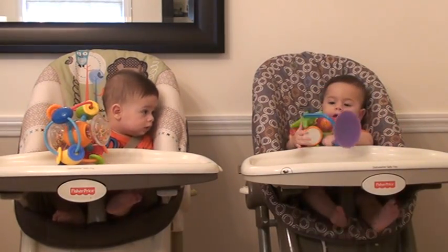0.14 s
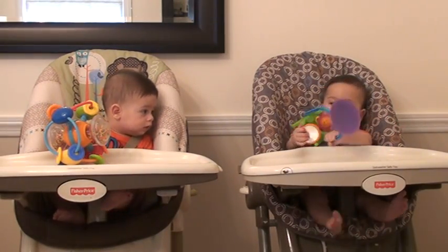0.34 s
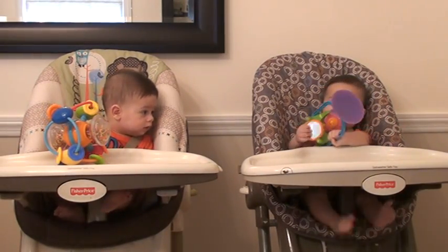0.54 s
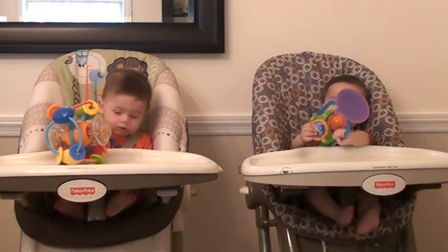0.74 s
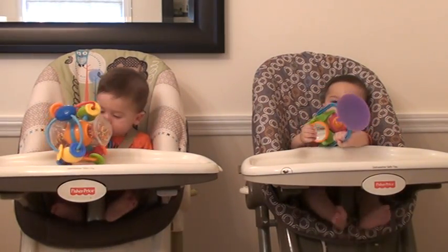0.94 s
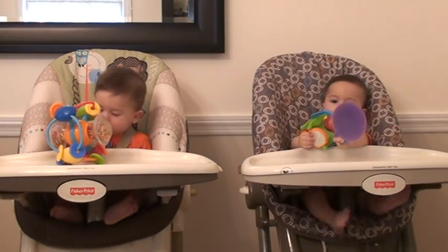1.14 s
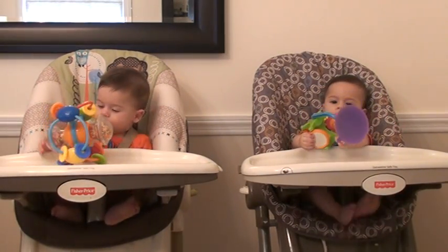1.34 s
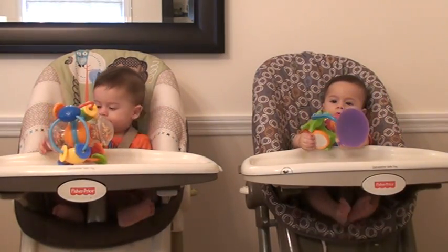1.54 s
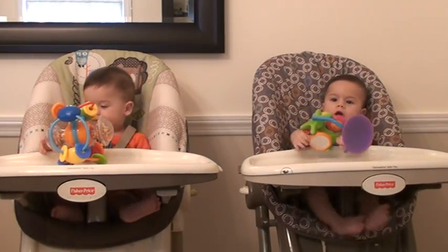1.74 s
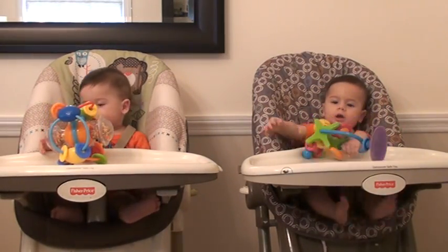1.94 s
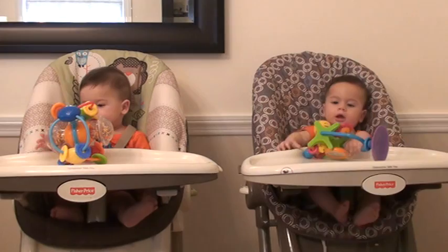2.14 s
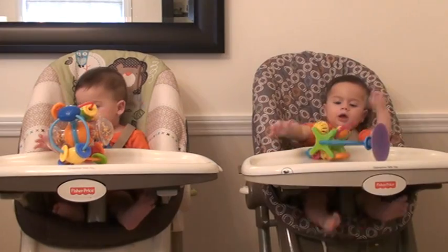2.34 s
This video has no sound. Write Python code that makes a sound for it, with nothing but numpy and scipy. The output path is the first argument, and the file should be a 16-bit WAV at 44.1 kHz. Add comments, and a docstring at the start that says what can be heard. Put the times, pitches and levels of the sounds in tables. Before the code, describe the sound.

Plastic rattle toys clack and jingle lightly, then one tumbles onto a hollow tray.

```python
"""Plastic rattle toys clack and a small bell jingles on a high-chair tray, close to a pair of
microphones in a small, live room. Loose parts knock, rebound and ring their hollow shells,
while a rolling pellet strikes the bell and beads tick inside a toy. Near the end a toy tumbles
onto the hollow tray and its beads scatter. A low household rumble lies behind it all."""
import sys
import numpy as np
from scipy import signal
from scipy.fft import rfft, irfft, next_fast_len
from scipy.io import wavfile
from scipy.ndimage import uniform_filter1d

SR = 44100
rng = np.random.default_rng(int(sys.argv[2]) if len(sys.argv) > 2 else 0)


def waveform_to_disk(signal):
    """Save audio, clipped to [-1, 1], as 16-bit WAV at the path in sys.argv[1]."""
    frames = np.transpose(np.atleast_2d(signal))
    scaled = np.clip(frames, -1, 1) * 32767
    samples = np.round(scaled).astype(np.int16)
    wavfile.write(sys.argv[1], SR, samples)


N = 105795

CLACK_T60_S, CONTACT_RISE_S, REBOUND_S, REBOUND_DB = 0.021, 0.0031, 0.0074, -9
def contact(t, rebounds=2):
    """A crack of hard plastic that builds briefly, followed by weaker rebounds."""
    gaps = REBOUND_S * rng.uniform(0.04, 1.62, rebounds)
    envelope = 0
    for k, at in enumerate(np.append(0, np.cumsum(gaps))):
        age = np.maximum(t - at, 0)
        envelope += amp(REBOUND_DB * k) * fade(age, CLACK_T60_S) * (1 - np.exp(-age / CONTACT_RISE_S))
    return envelope * rng.standard_normal(len(t))


# spectra of the knock, snap and thud in a blow on plastic: frequency_hz, gain_db
KNOCK_SPECTRUM = [(60, -28), (250, -13), (600, -4.5), (1400, -3), (2300, 0), (3100, -1), (4200, -9.5),
                  (7000, -32), (16000, -90)]
SNAP_SPECTRUM = [(1000, -31.5), (2800, -12.5), (4000, 2.5), (5400, 5), (7500, 3), (9800, -0.5),
                 (12000, -7.5), (16000, -12)]
THUD_SPECTRUM = [(50, -40), (170, -25.5), (340, 3.5), (950, 0), (1500, -8), (5000, -32)]
def knocks(hits, modes, detune, thud_db):
    """Plastic blows: a knock, a bright snap, and the ring and dull thud of the struck body."""
    out, t = np.zeros(N), np.arange(SR // 4) / SR
    for at, level_db, body_db, treble_db in hits:  # body and treble are relative to the level
        knock = burst(colour(contact(t), KNOCK_SPECTRUM))
        snap = amp(treble_db) * burst(colour(contact(t), SNAP_SPECTRUM))
        body = burst(ring(modes, t, scatter_db=3.0, detune=detune))
        thud = amp(thud_db) * burst(colour(contact(t), THUD_SPECTRUM))
        add(out, at, amp(level_db) * (knock + snap + amp(body_db) * (body + thud)))
    return out


# loose parts colliding: start_s, level_db, body_db, treble_db
PART_HITS = [(.079, -36, -33, 8), (.085, -27, -33, 4), (.093, -34, -19, -7), (.134, -48, -11, 3),
             (.152, -32, -3.5, 7), (.158, -33, -2.5, 10.5), (.172, -33.5, -24, 0),
             (.222, -36.5, -2.5, 10.5), (.470, -30, -24, -1), (.476, -33, -27, 8.5), (.509, -25, 2.5, -20),
             (.519, -27, 0, -2), (.544, -35.5, 1.5, 6), (.767, -38.5, 5.5, 3), (.774, -32.5, 1, -3),
             (.903, -40.5, -10, 1), (1.872, -34, -17, 3), (2.307, -27.5, -6.5, 3.5), (2.315, -22, -10, -5)]
# modes of the toy's shell: pitch_hz, level_db, t60_s
SHELL_MODES = [(284, -5.5, 0.1), (818, 0.5, 0.023), (1017, 3, 0.021), (1160, 4.5, 0.032), (1306, 0.5, 0.04),
               (1890, -3.5, 0.032)]
def clacks():
    """Loose parts knock together near the microphones and ring the hollow shell."""
    return amp(-8) * knocks(PART_HITS, SHELL_MODES, detune=0.03, thud_db=-5.5)


# the toy striking the tray: start_s, level_db, body_db, treble_db
TUMBLE_HITS = [(1.911, -31, -1, -20), (1.920, -20.5, 3, 1), (1.928, -23.5, -5, 6.5), (1.961, -26.5, -4, 10),
               (1.969, -23.5, 5, -10), (1.975, -22.5, -2, 6.5), (1.986, -24, -0.5, 3),
               (2.010, -27, -4, -10), (2.039, -36, 2, -6), (2.058, -29.5, -5, 7), (2.116, -35.5, 4, -18),
               (2.281, -31.5, -3.5, -10), (2.294, -28, -1, -2.5), (2.381, -38.5, 7, -5)]
# modes of the tray: pitch_hz, level_db, t60_s
TRAY_MODES = [(340.3, -2, 0.18), (425, -1.5, 0.13), (489, 1, 0.059), (547, 4.5, 0.065), (663.6, 6.5, 0.11),
              (766, -1, 0.049), (914, 0.5, 0.09), (990, -2, 0.072)]
def tumble():
    """A toy tumbles onto the hollow tray, which rings at each blow."""
    return amp(-5.5) * knocks(TUMBLE_HITS, TRAY_MODES, detune=0.025, thud_db=-8)


# light taps: start_s, level_db, body_db, treble_db
TAP_HITS = [(.968, -36, -0.5, -10.5), (.975, -38.5, 2.5, -24), (1.007, -51, 9, -22)]
# modes of the tapped part: pitch_hz, level_db, t60_s
SMALL_PART_MODES = [(1330, -4, 0.031), (1700, 1, 0.036), (2060, 5, 0.028), (2350, 6, 0.053),
                    (2825, 1, 0.046), (3286, -8, 0.029)]
def taps():
    """A small hollow plastic part is tapped and rings briefly."""
    return knocks(TAP_HITS, SMALL_PART_MODES, detune=0.0097, thud_db=-15)


# pellet striking the bell: start_s, level_db, low_db, upper_db (last two relative to the level)
PELLET_STRIKES = [(.002, -46.5, -15, -2), (0.077, -40, 6, -21), (0.13, -44, -6, 8.5), (0.217, -36, -2, -14),
                  (0.287, -41, -2, -2), (0.41, -43.5, 3, 6.5), (0.559, -39, -1, 2.5), (0.588, -41, -22, 5),
                  (0.618, -47.5, -5, 8), (0.654, -32.5, -14, -27), (0.687, -41, -19, -6),
                  (0.735, -44.5, -1, 1), (0.777, -56, -2, 15), (.797, -45, -14, 5), (1.231, -44.5, -11, -7),
                  (1.278, -35.5, -3.5, -1.5), (1.315, -33, -11, -6.5), (1.344, -38.5, -3.5, 5.5),
                  (1.372, -45.5, 6.5, 6), (1.409, -48.5, -5.5, 0.5), (1.534, -37.5, -15.5, -7),
                  (1.565, -45, -22, 1), (1.591, -35, -27, -9), (1.621, -50.5, -8, 6.5),
                  (1.969, -34.5, -20, 10), (2.056, -36.5, 5.5, 6), (2.105, -40, -4, -9),
                  (2.162, -36, 1, -9), (2.375, -43.5, 8, -12)]
# low, main and upper modes of the bell: pitch_hz, level_db, t60_s
LOW_MODES = [(2574, -13.5, 0.16), (3991, -9, 0.37), (5420, -12.5, 0.14), (5880, -14, 0.13)]
MAIN_MODES = [(7460, -15.5, 0.12), (8402, -2, 0.47)]
UPPER_MODES = [(9445, -4, 0.14), (9220, -4, 0.082), (9800, -3, 0.054), (10220, -9, 0.052),
               (10830, -8.5, 0.047), (12350, -16.5, 0.16)]
# shimmer of the rolling pellet: frequency_hz, gain_db
SHIMMER_SPECTRUM = [(2000, -5.5), (5000, -12), (7500, 4.5), (8900, -4), (10100, -0.5), (11200, -2),
                    (12200, -5), (16000, -14)]
BELL_RISE_S, CHOKE_LEAD_S, CHOKE_T60_S = 0.0034, 0.0037, 0.026
def bell():
    """Each pellet strike damps the last high ring and starts a new one; the low modes ring on."""
    out, t = np.zeros(N), np.arange(SR // 2) / SR
    gaps = np.diff([row[0] for row in PELLET_STRIKES] + [N / SR])
    for (at, level_db, low_db, upper_db), gap in zip(PELLET_STRIKES, gaps):
        groups = (LOW_MODES, low_db), (MAIN_MODES, 0), (UPPER_MODES, upper_db)
        low, main, upper = (amp(db) * ring(modes, t, scatter_db=0, detune=0.00266) * flutter(len(t))
                            for modes, db in groups)  # the pellet presses unevenly on the shell
        # the pellet brushes the shell just before its next strike
        choke = fade(np.maximum(t - gap + CHOKE_LEAD_S, 0), CHOKE_T60_S)
        shimmer = amp(-1.5 + upper_db / 2) * burst(colour(pellet_roll(t), SHIMMER_SPECTRUM))
        strike = amp(-0.5) * (low + (main + upper) * choke) + shimmer
        add(out, at, amp(level_db) * strike * (1 - np.exp(-t / BELL_RISE_S)))
    return out


def pellet_roll(t, grain_samples=110, spread_db=5.5):
    """The pellet chatters round the bell after a strike."""
    gains = amp(-spread_db * rng.standard_normal(len(t) // grain_samples + 1))
    chatter = np.repeat(gains, grain_samples)[:len(t)]
    return chatter * fade(t, t60_s=0.14) * rng.standard_normal(len(t))


# a bead hitting a hard part: start_s, level_db
PING_HITS = [(.545, -26), (.593, -33)]
# modes of the ping: pitch_hz, level_db, t60_s
PING_MODES = [(4730, -1, 0.02), (4800, -12, 0.02)]
def pings():
    """A single bead glances off a hard part with a short, bright ring."""
    out, t = np.zeros(N), np.arange(SR // 8) / SR
    for at, level_db in PING_HITS:
        add(out, at, amp(level_db) * ring(PING_MODES, t, scatter_db=-2.5))
    return out


# loudness of the loose beads, and of the fine ones sliding after the tumble: time_s, level_db
RATTLE_LEVELS = [(0, -51.5), (.07, -57.5), (.09, -39), (.2, -47), (.36, -57), (.8, -55.5), (1.0, -60.5),
                 (1.5, -63), (1.75, -80), (1.91, -49), (1.95, -37.5), (2.05, -41.5), (2.18, -49.5),
                 (2.27, -58), (2.32, -49.5), (2.4, -59)]
SLIDE_LEVELS = [(1.98, -70), (2.06, -46), (2.2, -49), (2.28, -65.5)]
# fizz of fine beads: frequency_hz, gain_db
FIZZ_SPECTRUM = [(4000, -20.5), (8000, 6), (11000, 8.5), (16000, 0)]
BEADS_PER_S, BEAD_SPREAD_DB = 280, 2.8
def beads():
    """Small beads tick at random inside the shell while the toy moves; the finest slide with a fizz."""
    t = np.arange(N) / SR
    impacts = rng.random(N) < BEADS_PER_S / SR
    strengths = amp(BEAD_SPREAD_DB * np.clip(rng.standard_normal(N), -2, 2))
    envelope = signal.fftconvolve(impacts * strengths, fade(t[:SR // 20], t60_s=0.018))[:N]
    grains = envelope * rng.standard_normal(N)
    rattle = unit(colour(grains, SNAP_SPECTRUM)) + amp(-6) * unit(colour(grains, KNOCK_SPECTRUM))
    fizz = unit(colour(grains, FIZZ_SPECTRUM))
    rattle_db = np.interp(t, *np.array(RATTLE_LEVELS).T)
    slide_db = np.interp(t, *np.array(SLIDE_LEVELS).T, left=-np.inf, right=-np.inf)
    return np.sqrt(N) * (rattle * amp(rattle_db) + fizz * amp(slide_db))


# single beads on the shell: start_s, level_db, treble_db (relative to the level)
CLICK_HITS = [(0.01, -52, -2), (0.079, -36, -12), (.160, -40, 1.5), (.291, -60, 15), (.326, -54, 7),
              (1.105, -43, -30), (1.215, -45, -31)]
# spectrum of one click: frequency_hz, gain_db
CLICK_SPECTRUM = [(1500, -6), (4500, -5), (10000, -22)]
def bead_clicks():
    """Single beads hit the shell and stand out crisply from the rattling."""
    out, t = np.zeros(N), np.arange(SR // 8) / SR
    for at, level_db, treble_db in CLICK_HITS:
        click = rng.standard_normal(len(t)) * fade(t, t60_s=0.05)
        fizz = amp(treble_db) * burst(colour(click, FIZZ_SPECTRUM))
        add(out, at, amp(level_db) * (burst(colour(click, CLICK_SPECTRUM)) + fizz))
    return out


# modes of the high chair: pitch_hz, level_db, t60_s
CHAIR_MODES = [(101, -3.5, 0.27), (218, -0.5, 0.47)]
def chair_bump(start_s=0.525):
    """A soft, low bump carries through the chair."""
    out, t = np.zeros(N), np.arange(SR // 2) / SR
    add(out, start_s, amp(-46) * ring(CHAIR_MODES, t, scatter_db=5))
    return out


# plastic sliding on plastic: frequency_hz, gain_db
RUB_SPECTRUM = [(1500, -25), (3000, 7), (6000, -29)]
def rub(start_s=1.78, length_s=0.13):
    """Plastic rubs faintly just before the toy tips over."""
    out, t = np.zeros(N), np.arange(SR // 2) / SR
    swell = np.sin(np.pi * np.minimum(t / length_s, 1)) * flutter(len(t))
    add(out, start_s, amp(-61) * swell * coloured_noise(len(t), RUB_SPECTRUM))
    return out


ROOM_T60_S, ROOM_TREBLE_T60_S, EARLY_DECAY_S, ECHOES_PER_S = 0.5, 0.41, 0.054, 900
def reflections():
    """Distinct echoes from tray and walls, then a dense tail that loses its treble first."""
    t = np.arange(SR * 3 // 4) / SR
    noise = rng.standard_normal(len(t))
    low = signal.sosfilt(signal.butter(1, 4000, fs=SR, output="sos"), noise)
    tail = low * fade(t, ROOM_T60_S) + (noise - low) * fade(t, ROOM_TREBLE_T60_S)
    tail *= 1 - np.exp(-t / 0.0076)
    echoes = (rng.random(len(t)) < ECHOES_PER_S / SR) * rng.standard_normal(len(t))
    early = echoes * np.exp(-t / EARLY_DECAY_S) * (t > 0.002)
    return amp(-2) * unit(tail) + amp(-3.5) * unit(early)


def room(x, turns_per_s=2.5):
    """The reflections reaching the microphones shift as the toys turn and tilt."""
    angle = 2 * np.pi * turns_per_s * np.arange(N) / SR
    facings = [turn(angle) * tilt(np.e * angle) for turn in (np.cos, np.sin) for tilt in (np.cos, np.sin)]
    return sum(signal.fftconvolve(x * facing, reflections())[:N] for facing in facings)


# background of the room: frequency_hz, gain_db
ROOM_TONE_SPECTRUM = [(25, -8), (48, -5), (72, -21), (100, -1.5), (140, 0), (270, -8.5), (500, -15.5),
                      (1100, -18.5), (2800, -26), (7300, -34.5), (11600, -36), (16000, -55)]
def room_tone():
    """Steady household rumble and faint hiss; the bass is nearly the same at both microphones."""
    mid, side = (coloured_noise(N, ROOM_TONE_SPECTRUM) for _ in range(2))
    side = colour(side, [(100, -37.0), (400, -8.5), (8000, -5.0)])
    return amp(-49.5) * np.array([mid + side, mid - side])


def amp(db):
    """Decibels to gain."""
    return 10 ** (np.asarray(db) / 20)


def unit(x):
    """Scale to unit energy."""
    return x / np.sqrt(np.sum(x ** 2) + 1e-18)


def burst(x):
    """Scale to the energy of a 4 ms full-level burst."""
    return unit(x) * np.sqrt(0.004 * SR)


def fade(t, t60_s):
    """Exponential decay, 60 dB down at t60_s."""
    return np.exp(-np.log(1000) * t / t60_s)


def add(out, at, x):
    """Mix a sound in at a time in seconds."""
    i = max(int(at * SR), 0)
    out[i:i + len(x)] += x[:max(len(out) - i, 0)]


def colour(x, points):
    """Causal filter through (frequency_hz, gain_db) points."""
    hz, db = np.array(points, float).T
    n = 2 * next_fast_len(len(x))
    f = np.arange(n // 2 + 1) * SR / n
    cepstrum = irfft(np.log(amp(np.interp(np.log(f + 1), np.log(hz), db))))
    cepstrum[1:n // 2] *= 2  # fold to minimum phase
    cepstrum[n // 2 + 1:] = 0
    return irfft(rfft(x, n) * np.exp(rfft(cepstrum)))[:len(x)]


def coloured_noise(count, spectrum):
    """Filtered noise at unit RMS."""
    return unit(colour(rng.standard_normal(count), spectrum)) * np.sqrt(count)


def ring(modes, t, scatter_db, detune=0.):
    """Decaying modes, scattered in level and pitch at each strike."""
    hz, db, t60_s = np.array(modes, float).T[:, :, None]
    size, shift = rng.standard_normal((2, len(hz), 1))
    sign = rng.choice([-1, 1], (len(hz), 1))
    tones = np.sin(2 * np.pi * hz * (1 + detune * shift) * t)
    return np.sum(sign * amp(db + scatter_db * size) * tones * fade(t, t60_s), axis=0)


def flutter(count, depth=0.41, smooth_s=0.0034):
    """A gain that wavers quickly and randomly around one."""
    size = int(smooth_s * SR)
    waver = uniform_filter1d(uniform_filter1d(rng.standard_normal(count), size), size)
    return 1 + depth * np.sqrt(1.5 * size) * waver


def scene():
    """A close pair of microphones: toys near the centre, the room's reflections spread around them."""
    plastic = clacks() + tumble() + taps() + beads() + bead_clicks() + chair_bump() + rub()
    jingle = bell() + pings()
    mid = plastic + jingle + room(plastic + amp(-7) * jingle)
    side = amp(-11) * colour(room(plastic + jingle), [(9800, 1.0), (12000, -6.5)])
    balance = amp([[-0.25], [0.25]])  # a touch to the right
    return np.array([mid + side, mid - side]) * balance + room_tone()


def record(dry, top_hz=16400):
    """The recorder cuts the top of the treble."""
    return signal.sosfilt(signal.ellip(10, .2, 80, top_hz, fs=SR, output="sos"), dry)


dry = scene()
out = record(dry)
waveform_to_disk(out)
```